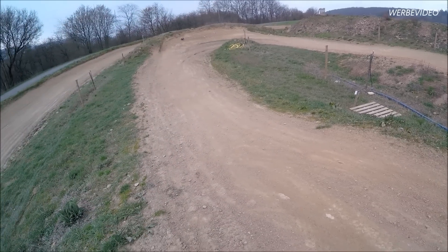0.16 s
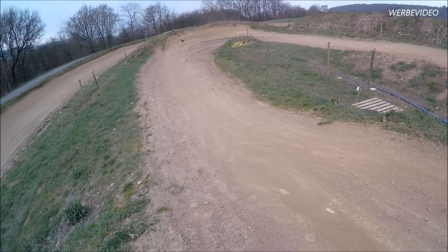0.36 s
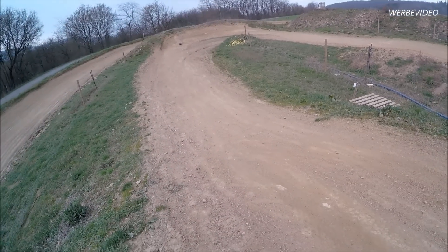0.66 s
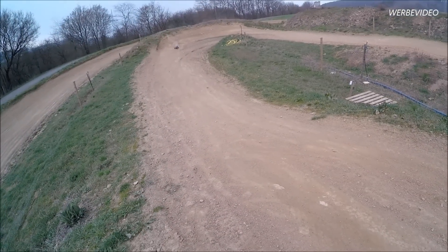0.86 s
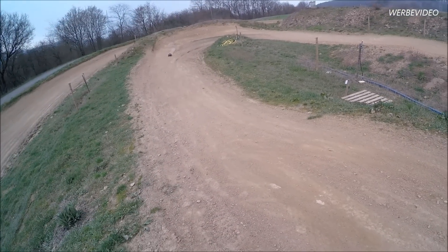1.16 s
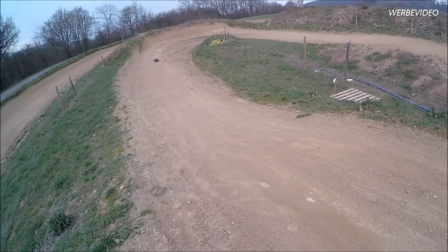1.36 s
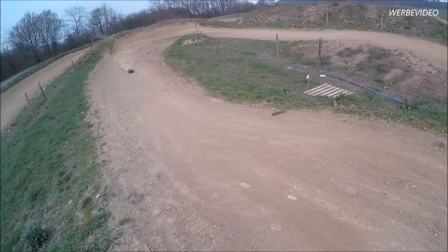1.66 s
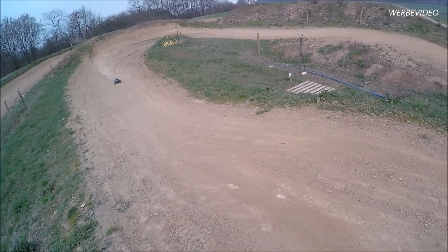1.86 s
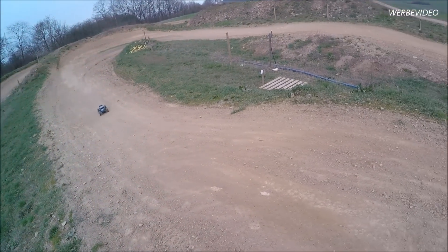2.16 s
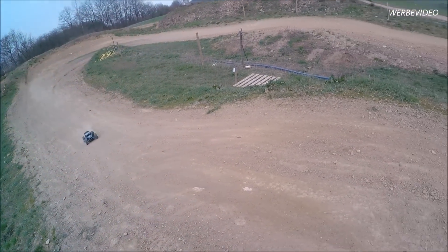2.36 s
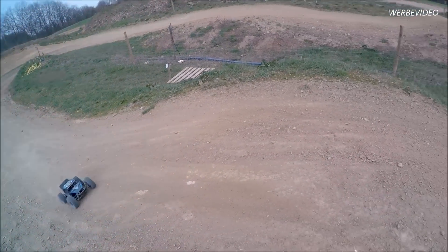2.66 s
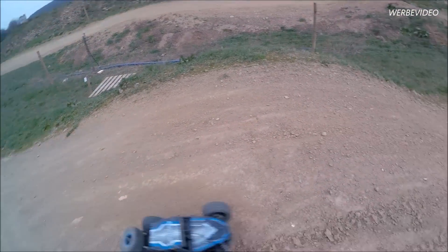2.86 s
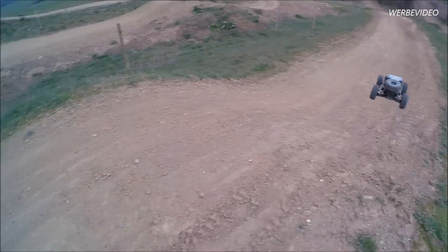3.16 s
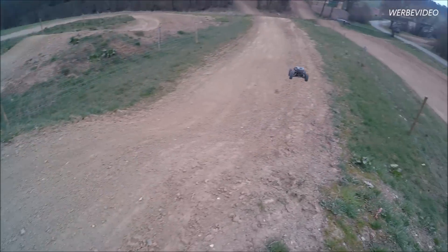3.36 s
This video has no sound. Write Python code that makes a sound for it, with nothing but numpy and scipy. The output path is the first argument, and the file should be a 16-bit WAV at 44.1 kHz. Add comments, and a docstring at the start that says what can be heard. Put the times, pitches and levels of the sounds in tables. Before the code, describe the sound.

Distant high motor whine comes in throttle bursts with faint tyre hiss and chassis rattles; low wind thumps the fixed trackside microphone, then the car sweeps by in crackling gravel and drives away.

```python
"""You hear an electric model car race up a dirt track, pass close by at about 3 s and drive away.
Its gears whine in throttle bursts: a wavering tone with sidebands, overtones and echoes from trees.
Noise and random grains make the tyres on dirt; short rings make the rattles and pebbles.
Filtered noise makes the wind on the microphone, hardest while the car approaches."""
import sys
import numpy as np
from scipy import signal
from scipy.fft import rfft, irfft
from scipy.io import wavfile
from scipy.ndimage import uniform_filter1d

SR = 44100
rng = np.random.default_rng(int(sys.argv[2]) if len(sys.argv) > 2 else 0)


def generate_wav(signal):
    """Clip the signal to [-1, 1] and save it as 16-bit WAV at the path in sys.argv[1]."""
    frames = np.transpose(np.atleast_2d(signal))
    scaled = np.clip(frames, -1, 1) * 32767
    pcm = np.round(scaled).astype(np.int16)
    wavfile.write(sys.argv[1], SR, pcm)


N = 154350  # samples, 3.5 s

# Wind between buffets. Each row: time in seconds, level in dB before WIND_DB.
WIND_LEVEL = [(0, -27.5), (.1, -35), (.3, -32.5), (.45, -28), (.55, -31), (.75, -25.5), (.95, -33.5),
              (1.1, -25), (1.3, -19), (1.44, -22), (1.7, -14), (1.86, -21), (2.08, -19), (2.3, -16.5),
              (2.5, -14.5), (2.8, -15.5), (2.86, -17.5), (3.0, -19), (3.06, -30.5), (3.15, -21.5),
              (3.3, -29.5), (3.5, -27)]
# Short buffets of wind. Each row: middle in seconds, half length in seconds, level in dB before WIND_DB.
BUFFETS = [(.623, 0.0075, -21.5), (0.89, 0.0081, -20), (1.019, 0.019, -12.5), (1.162, 0.0085, -12),
           (1.497, 0.015, -12.5), (1.597, 0.012, -14), (1.654, 0.0088, -14), (1.72, 0.026, -12.5),
           (1.785, 0.014, -8), (1.935, 0.02, -12.5), (1.992, 0.016, -10), (2.152, 0.012, -8),
           (2.229, 0.015, -15.5), (2.402, 0.015, -10.5), (2.528, 0.027, -9.5), (2.616, 0.034, -12),
           (2.784, 0.028, -9)]
# Tone colour of the wind's rumble. Each row: frequency in Hz, relative level in dB per Hz.
RUMBLE_COLOUR = [(15, -19), (30, -3.5), (50, -2.5), (75, 1.5), (120, -1.5), (190, -7), (280, -21.5),
                 (450, -34), (1000, -61), (3000, -93), (9000, -110)]
# Tone colour of the brighter eddies. Each row: frequency in Hz, relative level in dB per Hz.
EDDY_COLOUR = [(100, -15), (200, 3), (300, -2), (450, -11), (700, -18.5), (1200, -30), (3000, -52),
               (9000, -85)]
# How strong the eddies are beside the rumble. Each row: time in seconds, level in dB.
EDDY_SHARE = [(0, -12), (1.0, -18.5), (1.52, -30), (1.59, -5.5), (1.65, -21), (1.72, -10.5), (2.1, -12.5),
              (2.25, -7), (2.35, -9), (2.55, -6.5), (2.64, -5), (2.8, -6.5), (2.9, -15), (3.5, -34)]
WIND_DB, WIND_FLICKER_DB, EDDIES_PER_S = -1.5, 2.7, 500
# Deep sway of air under the gusts. Each row: time in seconds, level in dB before SWAY_DB.
SWAY_LEVEL = [(0, -35.5), (.55, -36.5), (.88, -29.5), (.95, -36), (1.02, -18), (1.09, -34), (1.35, -23.5),
              (1.6, -23.5), (2.0, -29), (2.8, -26), (2.93, -23), (3.05, -28), (3.15, -24.5), (3.27, -29),
              (3.5, -31)]
SWAY_DB, SWAY_HZ, SWAY_WIDTH_HZ = -0.5, 55.4, 35
# Sharp slaps of air. Each row: start in seconds, level in dB (before the swell and fall), centre in Hz.
SLAPS = [(.621, -34, 229), (1.029, -23, 189), (1.578, -19.5, 650), (1.689, -19, 257), (1.768, -17, 250),
         (1.989, -16.5, 280), (2.141, -13, 260), (2.234, -18.5, 400), (2.636, -21, 422),
         (2.748, -17.5, 330)]
SLAP_S, SLAP_DAMPING = 0.0084, 0.38  # fall time in seconds; a larger damping gives a wider band
# Brief narrow swells of wind noise, rising in pitch. Each row: peak in seconds, pitch in Hz,
# width in Hz, level in dB, rise in seconds, fall in seconds, bend as a share of the pitch.
WIND_SWELLS = [(1.71, 480, 70, -34, 0.021, 0.027, .2), (1.96, 450, 40, -31, .02, .02, .25),
               (2.015, 570, 45, -34, .02, 0.017, .25), (2.05, 410, 35, -32, .02, .015, .5),
               (2.535, 270, 80, -17.5, 0.017, 0.017, .3)]
# Pressure thumps as the car passes. Each row: middle in seconds, peak in dB, half length in seconds.
PRESSURE_THUMPS = [(2.928, -4.5, 0.0032), (3.115, -15, 0.0032)]
WIND_LIMIT = 0.7  # pressure at which the port chokes, share of full scale

# Tyres on dirt. Each row: time in seconds, level of the scrub in dB, level of the grit in dB,
# level of the fine spray in dB; all before the trims.
TYRE_LEVELS = [(0, -41.5, -45.5, -61.5), (.12, -41, -45, -59.5), (.19, -41, -45.5, -62.5),
               (.28, -42, -41, -58), (.41, -37.5, -43, -56.5), (.52, -40, -43, -55), (.7, -39, -42, -56),
               (.84, -38, -42, -55.5), (.92, -42, -45.5, -63), (1.05, -38.5, -44, -56.5),
               (1.38, -40, -41, -56.5), (1.55, -39, -43, -55.5), (1.76, -41, -39, -52.5),
               (1.96, -40, -36, -54), (1.99, -42, -42, -59.5), (2.2, -41, -38.5, -58), (2.3, -38, -42, -63),
               (2.35, -38.5, -33, -51.5), (2.45, -31, -32, -49.5), (2.54, -41.5, -35, -54.5),
               (2.62, -27.5, -31, -51.5), (2.72, -30.5, -31.5, -49), (2.838, -34, -28.5, -43),
               (2.862, -30.5, -21.5, -31.5), (2.94, -23.5, -21, -32.5), (3.04, -28.5, -21.5, -32),
               (3.11, -31.5, -22.5, -42), (3.14, -38, -29, -46.5), (3.25, -39, -32, -52.5),
               (3.38, -41, -33.5, -50), (3.5, -38, -37, -54)]
TYRE_TRIMS_DB = (0, 0, 1.5)  # scrub, grit, spray
SCRUB_TOP_HZ, GRIT_TOP_HZ = 1560, 6680
# Tyre colour in the farthest bend. Each row: frequency in Hz, relative level in dB per Hz.
DISTANT_COLOUR = [(400, -3.5), (800, -0.5), (1200, -4), (1700, -6.5), (2300, -8), (2700, -7), (3400, -11.5),
                  (3950, -9.5), (4400, -14), (4900, -7), (6000, -11), (6600, -23), (7400, -20.5),
                  (8300, -21.5), (10200, -22.5), (11100, -27), (11600, -27), (12000, -33), (12500, -30.5),
                  (13800, -37), (15000, -44)]
# Tyre colour far off. Each row: frequency in Hz, relative level in dB per Hz.
FAR_COLOUR = [(400, -4.5), (900, -2), (1300, -5), (1800, -3.5), (2300, -10), (2700, -6.5), (3300, -12.5),
              (3900, -11), (4350, -15), (4900, -4.5), (6000, -11), (6650, -31), (7400, -23), (8300, -21),
              (10400, -22.5), (11100, -30), (11600, -25), (12000, -35), (12500, -28), (13800, -38),
              (15000, -48)]
# Tyre colour as the car approaches. Each row: frequency in Hz, relative level in dB per Hz.
APPROACH_COLOUR = [(400, 7.5), (900, 5.5), (1500, -3.5), (2200, 2), (3100, -7.5), (3900, -4), (4400, -6),
                   (5400, -0.5), (6250, -5), (6800, -15.5), (8500, -17), (10200, -21.5), (11150, -28),
                   (11600, -23), (12000, -35), (12500, -27), (13500, -32), (15000, -43)]
# Tyre colour alongside. Each row: frequency in Hz, relative level in dB per Hz.
ALONGSIDE_COLOUR = [(350, 5.5), (600, 9), (950, 1.5), (1200, 5), (1450, 0.5), (2200, 2), (2900, -2.5),
                    (4300, -3), (5600, 0), (7000, -7), (10300, -12.5), (11300, -9), (12000, -18),
                    (12900, -16), (14500, -39)]
# Tyre colour from behind. Each row: frequency in Hz, relative level in dB per Hz.
BEHIND_COLOUR = [(400, -2.5), (850, -3), (1200, -2.5), (2200, 5), (2900, 0), (3500, 4.5), (4200, 0.5),
                 (5200, 4), (6200, -3.5), (7000, -7.5), (10000, -11), (11500, -9), (12100, -20),
                 (12500, -12), (13200, -14), (14300, -42)]
# Blends from each tyre colour to the next: start and end of each in turn, in seconds.
BLEND_TIMES = [.6, 1.1, 1.8, 2.35, 2.8, 2.88, 3.0, 3.1]
GRAINS_PER_S, GRAIN_SPREAD_DB, BOUNCE_DB = 4500, 3, 1.35
GRAIN_SHARE = 0.48  # share of the dirt's power in grains; the rest is hiss
# How late the ground reflection comes. Each row: time in seconds, delay in milliseconds.
GROUND_LAG = [(0, 1.6), (.4, 1.44), (.75, 1.27), (1.05, 1.16), (1.5, 1.082), (2.3, 0.77)]
GROUND_GAIN = 0.28
# Tyres roar as the car slides through the far bend. Each row: peak in seconds, pitch in Hz,
# width in Hz, level in dB, rise in seconds, fall in seconds, bend as a share of the pitch.
SKIDS = [(.18, 800, 300, -39.5, .025, .03, 0), (.42, 830, 380, -37.5, .035, .03, 0),
         (.73, 800, 130, -40, .04, .07, -.04)]
# Stone cracks near the pass, and one faint high tick before.
# Each row: start in seconds, rough peak in dB, centre in Hz.
CRACKS = [(2.125, -44, 12000), (2.861, -11, 6000), (2.9258, -11, 5300), (2.9834, -14, 4700),
          (3.035, -17, 6300)]
CRACK_S, CRACK_WIDTH_HZ = 0.0021, 3200
# Pebbles flung against the chassis as the car passes.
PEBBLE_AT_S, PEBBLE_SPREAD_S, PEBBLE_DB, PEBBLE_RING_S = 2.99, .08, -27.5, 0.0043
PEBBLE_LOW_HZ, PEBBLE_HIGH_HZ = 1587, 7000

# Chassis rattles. Each row: middle in seconds, level in dB.
RATTLES = [(.635, -43), (.655, -42), (.875, -42.5), (1.137, -44), (1.16, -36.5), (1.28, -44), (1.34, -43),
           (1.45, -40.5), (1.525, -36), (1.72, -39.5), (1.765, -40), (1.865, -35.5), (1.9, -34),
           (1.96, -38), (2.08, -40.5), (2.14, -42)]
RATTLE_HZ, RATTLE_WIDTH_HZ, RATTLE_S = 2657, 170, 0.008
# Rough car tones: motor whine, tyre hum and body resonances. Each row: peak in seconds, pitch in Hz,
# width in Hz, level in dB, rise in seconds, fall in seconds, bend as a share of the pitch.
CAR_TONES = [(1.4, 2660, 80, -48, .25, .5, 0), (1.92, 2100, 110, -48, .2, .3, -0.006),
             (2.36, 2150, 200, -39, .025, .1, 0), (2.44, 2560, 300, -37, 0.065, 0.07, 0.0079),
             (2.64, 2150, 180, -39, .03, .05, -0.00039), (2.81, 2200, 150, -30.5, 0.06, 0.026, .04),
             (2.92, 790, 70, -32, .03, 0.044, -.05), (2.99, 635, 110, -26, 0.024, .025, -0.079),
             (2.93, 1750, 70, -25.5, .026, .07, -.03), (2.925, 2150, 130, -26.5, .025, .025, -.08),
             (2.99, 2220, 80, -26.5, .015, 0.091, -.04), (3.07, 1110, 35, -28, .04, 0.091, .02),
             (3.07, 1310, 76, -31, .035, 0.066, -.02), (3.1, 1700, 60, -31, .05, .11, -.035),
             (3.08, 3400, 140, -27.5, 0.036, 0.064, .035), (3.2, 3540, 90, -37.5, .048, .14, .015),
             (2.96, 11450, 180, -43, 0.11, 0.22, 0), (3.05, 10950, 380, -44, .1, .45, -.008),
             (3.2, 13050, 350, -54, .05, .25, 0)]
BEND_S = .1  # time over which a swelling tone bends
# Gear whine. Each row: time in seconds, pitch in Hz, level in dB before WHINE_DB.
WHINE = [(0, 3190, -45.5), (.07, 2980, -51), (.135, 3910, -57), (.17, 3250, -44), (.22, 3280, -43.5),
         (.26, 3693, -47), (.29, 4220, -60), (.335, 4700, -47), (.375, 4870, -37.5), (.415, 5020, -35.5),
         (.45, 4810, -45), (.5, 5090, -47), (.55, 4980, -42), (.63, 5280, -43), (.68, 5380, -47),
         (.735, 5480, -47), (.76, 4950, -45), (.785, 4640, -47), (.815, 4810, -39), (.845, 5310, -52),
         (.93, 5400, -64), (.99, 5220, -65), (1.015, 4980, -42), (1.045, 4860, -42), (1.09, 5240, -47),
         (1.15, 5450, -53), (1.19, 5066, -42), (1.225, 5070, -39.5), (1.28, 5370, -38), (1.32, 5350, -37.5),
         (1.36, 5450, -39.5), (1.41, 5270, -34.5), (1.47, 5600, -50), (1.55, 5500, -62), (1.62, 5140, -54),
         (1.675, 5120, -42), (1.71, 5375, -32.5), (1.735, 5590, -51), (1.775, 5640, -45.5),
         (1.8, 5106, -35.5), (1.825, 5200, -38.5), (1.875, 5660, -40.5), (1.91, 5570, -44),
         (1.945, 5290, -33.5), (1.965, 5450, -39), (1.975, 5400, -49), (2.05, 5400, -57)]
# Unsteadiness of the whine. Each row: time in seconds, wander as a share of the pitch.
UNSTEADY = [(0, 0.03), (.3, .024), (.85, 0.014), (1.2, 0.0044), (2.0, 0.0042)]
# Ragged overtones of the gearbox. Each row: multiple of the pitch, level in dB,
# frequency in Hz where it is loudest, width in Hz.
OVERTONES = [(2, -14.5, 10110, 550), (2.63, -31, 13750, 300)]
OVERTONE_JITTER, OVERTONE_FLUTTER_DB = 0.021, 4  # jitter is a share of the pitch
WHINE_DB, WHINE_FLUTTER_DB, SIDEBAND_DB, PINION_TEETH = -.5, 2.7, -16.5, 13
TREES_DB, TREES_T60_S = -12, 0.4  # echo level, and the time in which it falls by 60 dB
TOP_HZ = 15100


def undb(db):
    """Turn decibels into a gain."""
    return 10 ** (np.asarray(db) / 20)


def clock():
    """Time of each sample in seconds."""
    return np.arange(N) / SR


def curve(rows):
    """Join the rows of a table by straight lines in time, one curve for each later column."""
    rows = np.array(rows, float)
    return [np.interp(clock(), rows[:, 0], column) for column in rows.T[1:]]


def unit(x):
    """Scale to an average strength (rms) of 1."""
    return x / np.sqrt(np.mean(x ** 2) + 1e-20)


def shape(x, gain):
    """Filter by a gain that depends on frequency, then scale to rms 1."""
    hz = np.maximum(np.fft.rfftfreq(N, 1 / SR), 1)
    return unit(irfft(rfft(x) * gain(hz), N))


def colour(x, points):
    """Filter by (Hz, dB) points, joined on a logarithmic frequency scale."""
    hz, db = np.array(points, float).T
    return shape(x, lambda f: undb(np.interp(np.log(f), np.log(hz), db)))


def ring(hz, width):
    """A resonance shaken at random; its centre may move."""
    phase = 2 * np.pi * np.cumsum(hz * np.ones(N)) / SR
    lowpass = lambda f: 1 / (1 + (f / width * 1.54) ** 2)
    a = shape(rng.standard_normal(N), lowpass)
    b = shape(rng.standard_normal(N), lowpass)
    return a * np.cos(phase) + b * np.sin(phase)


def walk(rate):
    """Random wandering with spread 1, slower than about rate in Hz."""
    return shape(rng.standard_normal(N), lambda f: 1 / (1 + (f / rate) ** 4))


def steady(x, size=1500):
    """Even out the slow swells of a noise; size is in samples."""
    power = uniform_filter1d(uniform_filter1d(x ** 2, size), size)
    return x / np.sqrt(power + 0.022)


def swells(rows):
    """Rough tones that swell, bend in pitch and fade."""
    t, out = clock(), 0
    for peak, hz, width, db, rise, fall, bend in rows:
        rising = np.exp(-.5 * ((t - peak) / rise) ** 2)
        falling = np.exp(-np.abs(t - peak) / fall)
        envelope = np.where(t < peak, rising, falling)
        pitch = hz * (1 + bend * np.tanh((t - peak) / BEND_S))
        out = out + undb(db) * envelope * steady(ring(pitch, width))
    return out


def sway():
    """Air sways slowly under the gusts: a deep, wide resonance shaken at random."""
    return undb(SWAY_DB + curve(SWAY_LEVEL)[0]) * steady(ring(SWAY_HZ, SWAY_WIDTH_HZ))


def wind():
    """Air rumbles on the microphone with short buffets, and sheds brighter eddies."""
    t = clock()
    power = undb(curve(WIND_LEVEL)[0]) ** 2
    for middle, half, db in BUFFETS:
        power = power + undb(db) ** 2 * np.exp(-((t - middle) / half) ** 2)
    rumble = steady(colour(rng.standard_normal(N), RUMBLE_COLOUR), size=900)
    rumble = rumble * undb(WIND_FLICKER_DB * walk(35.6))
    puffs = (rng.random(N) < EDDIES_PER_S / SR) * rng.standard_normal(N)
    eddies = steady(colour(puffs, EDDY_COLOUR), size=2500) * undb(curve(EDDY_SHARE)[0])
    return np.sqrt(power) * undb(WIND_DB) * (rumble + eddies)


def slaps():
    """Air strikes the microphone port: a sudden dull pop of noise that dies in a few cycles."""
    t, out = clock(), 0
    for start, db, hz in SLAPS:
        def dull_band(f):
            resonance = 1 / np.hypot(1, (f / hz - hz / f) / SLAP_DAMPING / 2)
            return resonance / (1 + (f / hz / 1.82) ** 3)
        age = np.maximum(t - start, 0) / SLAP_S
        air = steady(shape(rng.standard_normal(N), dull_band), size=300)
        out = out + undb(db) * air * (1 - np.exp(-10 * age)) * np.exp(.5 - age)
    return out


def wind_swells():
    """Brief narrow swells of wind noise, rising in pitch."""
    return swells(WIND_SWELLS)


def pressure_thumps():
    """Pressure thumps as the car passes, each a brief drop in pressure."""
    t, out = clock(), 0
    for middle, db, half in PRESSURE_THUMPS:
        x = (t - middle) / half
        out = out + undb(db) * (x ** 2 / 2 - 1) * np.exp(-.5 * x ** 2)
    return out


def cracks():
    """Stone cracks near the pass and one faint high tick before: bursts of noise that die fast."""
    t, out = clock(), 0
    for start, db, hz in CRACKS:
        crack = shape(rng.standard_normal(N), lambda f: 1 / (1 + ((f - hz) / CRACK_WIDTH_HZ) ** 4))
        fade = (t >= start) * np.exp(-np.minimum(np.abs(t - start) / CRACK_S, 20))
        out = out + undb(db) / 2 * crack * fade  # halved, as noise peaks well above its rms
    return out


def pebbles(count=130):
    """Small stones tick on plastic, each with its own short ring."""
    out, age = np.zeros(N + 2000), np.arange(2000) / SR
    for chance, pitch, size in rng.random((count, 3)):
        # times crowd around the pass and thin out on both sides
        when = PEBBLE_AT_S + PEBBLE_SPREAD_S * np.log(chance / (1 - chance)) / 2
        i = int(np.clip(when, 0, (N - 1) / SR) * SR)
        hz = PEBBLE_LOW_HZ + (PEBBLE_HIGH_HZ - PEBBLE_LOW_HZ) * pitch
        near = 2 * np.sqrt(chance * (1 - chance))  # loudest at the pass
        level = near * undb(PEBBLE_DB + 10 * (size - .5))
        out[i:i + len(age)] += level * np.sin(2 * np.pi * hz * age) * np.exp(-age / PEBBLE_RING_S)
    return out[:N]


def skids():
    """Tyres roar as the car slides: wide bands of noise that swell and fade."""
    return swells(SKIDS)


def tyres():
    """Grains of dirt over a hiss; the ground mirrors the far car, and the colour turns as it passes."""
    t = clock()
    hits = (rng.random(N) < GRAINS_PER_S / SR) * rng.choice([-1, 1], N)
    grains = hits * undb(GRAIN_SPREAD_DB * np.minimum(rng.exponential(size=N), 5))
    hiss = rng.standard_normal(N)
    dirt = np.sqrt(GRAIN_SHARE) * unit(grains) + np.sqrt(1 - GRAIN_SHARE) * hiss
    dirt = dirt * undb(BOUNCE_DB * walk(63))
    lag = curve(GROUND_LAG)[0] / 1000  # milliseconds to seconds
    far = dirt + GROUND_GAIN * np.interp(t - lag, t, dirt)
    views = [colour(far, DISTANT_COLOUR), colour(far, FAR_COLOUR), colour(dirt, APPROACH_COLOUR),
             colour(dirt, ALONGSIDE_COLOUR), colour(dirt, BEHIND_COLOUR)]
    # each view holds at full weight between its blends
    corners = np.repeat(np.eye(len(views)), 2, axis=1)[:, 1:-1]
    weights = [np.interp(t, BLEND_TIMES, row) for row in corners]
    below = lambda f, hz: 1 / (1 + (f / hz) ** 24)
    scrub = lambda f: below(f, SCRUB_TOP_HZ) / (1 + (330 / f) ** 4)
    grit = lambda f: below(f, GRIT_TOP_HZ) - below(f, SCRUB_TOP_HZ)
    spray = lambda f: 1 - below(f, GRIT_TOP_HZ)
    out = 0
    for band, db, trim in zip((scrub, grit, spray), curve(TYRE_LEVELS), TYRE_TRIMS_DB):
        blend = sum(w * shape(view, band) for w, view in zip(weights, views))
        out = out + undb(db + trim) * blend
    return out


def chassis():
    """Each bump shakes a short rattle out of the chassis: a narrow and a wide resonance."""
    t = clock()
    shake = sum(undb(db) * np.exp(-.5 * ((t - middle) / RATTLE_S) ** 2) for middle, db in RATTLES)
    narrow = steady(ring(RATTLE_HZ, RATTLE_WIDTH_HZ), size=500)
    return shake * (narrow + undb(-9) * ring(2900, 1500))


def car_tones():
    """Motor whine, tyre hum and body resonances: rough tones that swell and fade, most bending in pitch."""
    return swells(CAR_TONES)


def gears():
    """Meshing teeth whine, with sidebands once and twice a turn and overtones; trees scatter it all."""
    hz, db = curve(WHINE)
    hz = uniform_filter1d(hz, 600)
    turn = lambda f: 2 * np.pi * np.cumsum(f) / SR  # frequency to phase
    phase = turn(hz * (1 + curve(UNSTEADY)[0] * walk(171)))
    once = walk(50) * np.cos(phase / PINION_TEETH)
    twice = walk(50) * np.cos(2 * phase / PINION_TEETH)
    wobble = 1 + undb(SIDEBAND_DB) * 2 * (once + 0.54 * twice)
    tone = np.sin(phase) * wobble * undb(WHINE_FLUTTER_DB * walk(54))
    for multiple, over_db, best_hz, width in OVERTONES:
        over_hz = multiple * hz
        resonance = 1 / np.hypot(1, (over_hz - best_hz) / width * 2)
        gain = undb(over_db + OVERTONE_FLUTTER_DB * walk(70)) * resonance
        tone = tone + gain * np.sin(turn(over_hz * (1 + OVERTONE_JITTER * walk(300))))
    tone = np.sqrt(2) * tone * undb(db + WHINE_DB)  # a sine times root 2 has rms 1
    tail = rng.standard_normal(N) * undb(-60 * clock() / TREES_T60_S)
    echo = signal.fftconvolve(tone, tail / np.linalg.norm(tail))[:N]
    return tone + undb(TREES_DB) * echo


def scene():
    """The car and the wind at one microphone; the port flattens the hardest gusts."""
    air = sway() + wind() + slaps() + wind_swells() + pressure_thumps()
    air = air / (1 + (air / WIND_LIMIT) ** 4) ** (1 / 4)
    dirt = cracks() + pebbles() + skids() + tyres()
    car = chassis() + car_tones() + gears()
    return (air + dirt + car)[None]


def record(dry):
    """Round the highest peaks softly and cut the sound above TOP_HZ."""
    soft = dry / (1 + (dry / .95) ** 6) ** (1 / 6)
    top_cut = signal.ellip(8, .2, 70, TOP_HZ, fs=SR, output="sos")
    return signal.sosfilt(top_cut, soft)


dry = scene()
out = record(dry)
generate_wav(out)
```